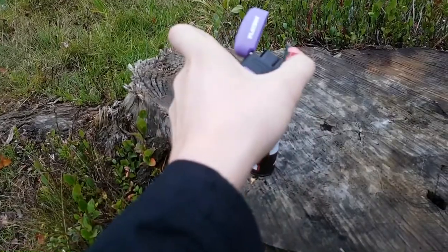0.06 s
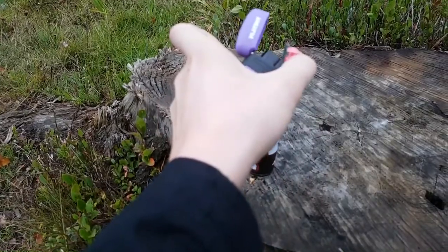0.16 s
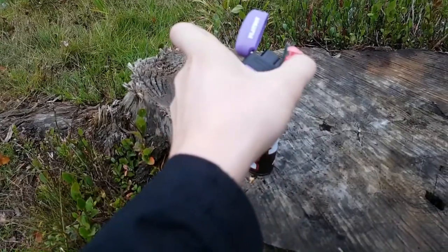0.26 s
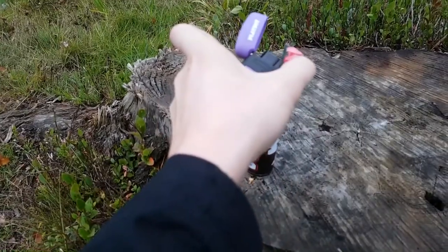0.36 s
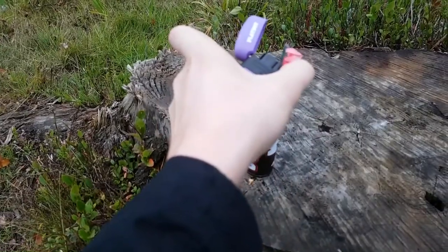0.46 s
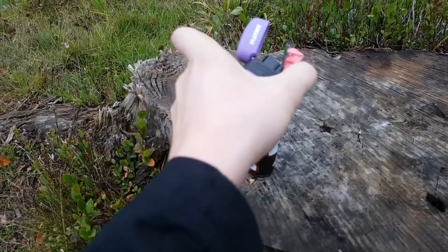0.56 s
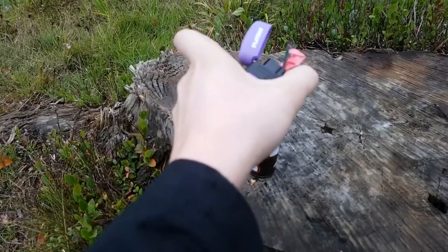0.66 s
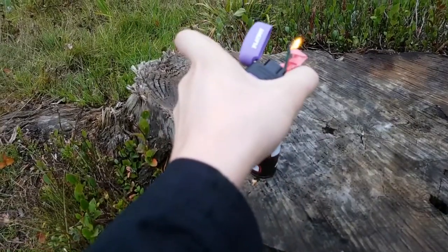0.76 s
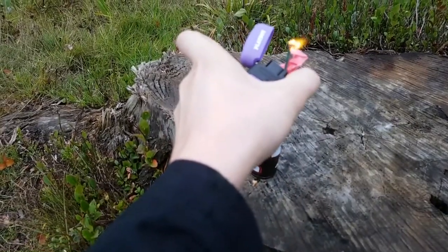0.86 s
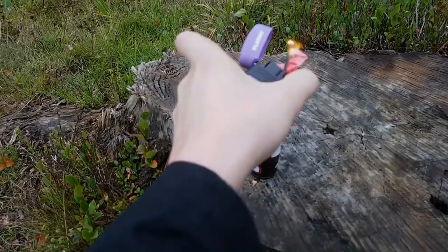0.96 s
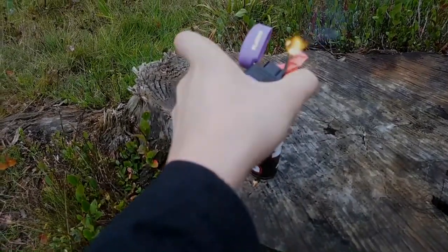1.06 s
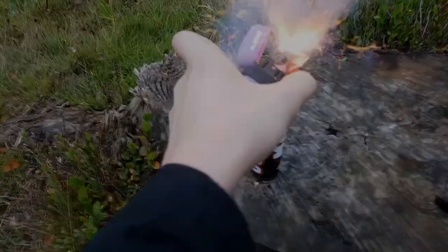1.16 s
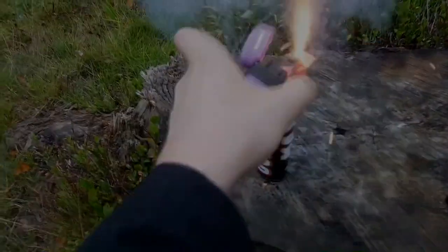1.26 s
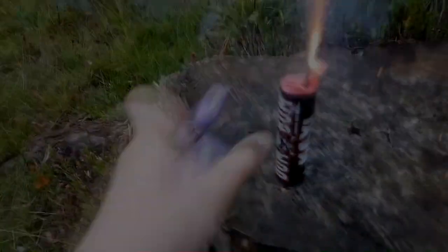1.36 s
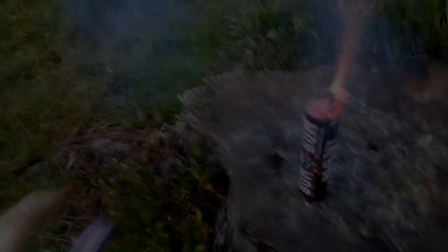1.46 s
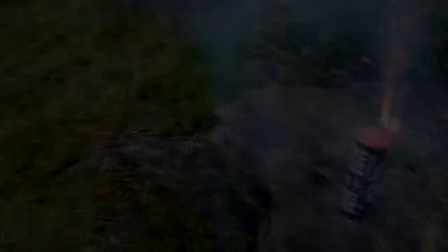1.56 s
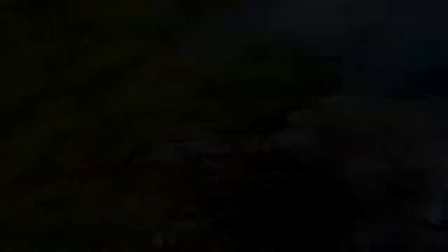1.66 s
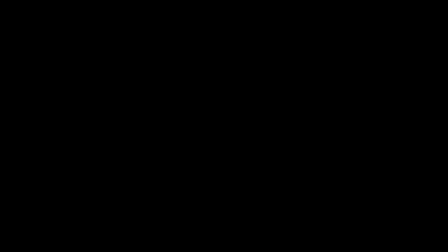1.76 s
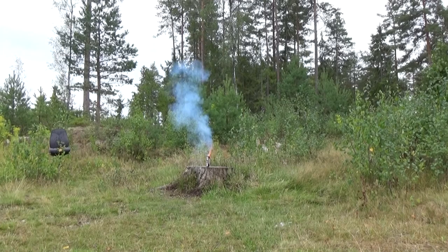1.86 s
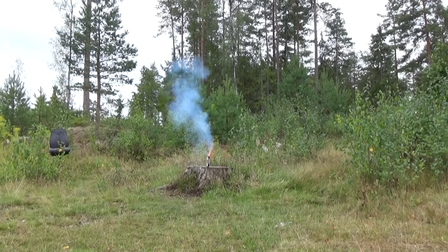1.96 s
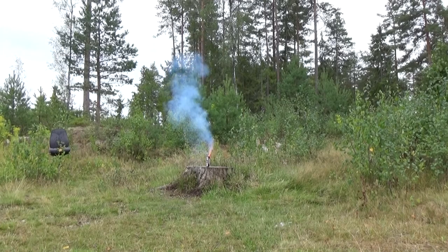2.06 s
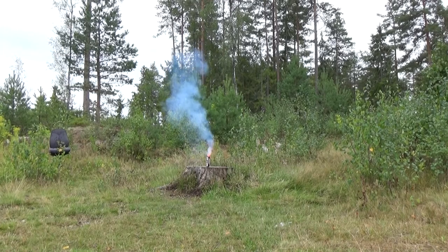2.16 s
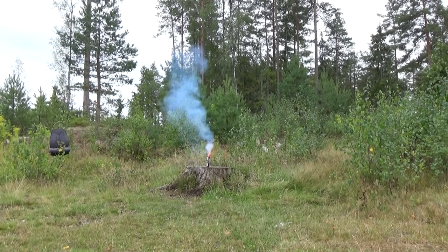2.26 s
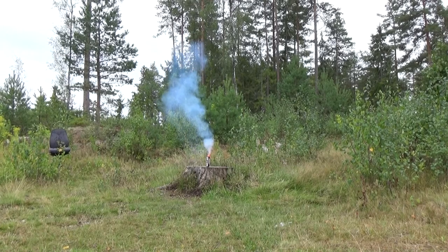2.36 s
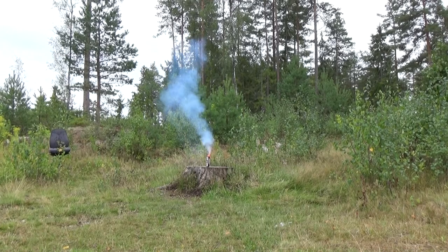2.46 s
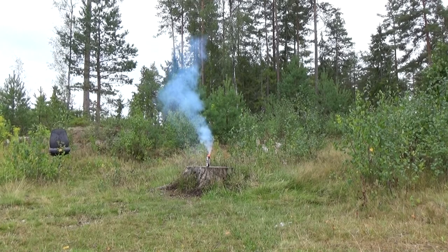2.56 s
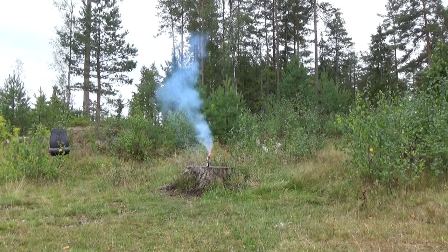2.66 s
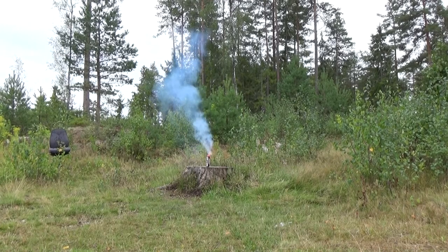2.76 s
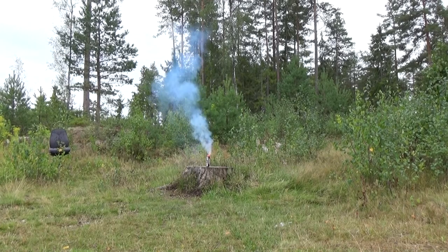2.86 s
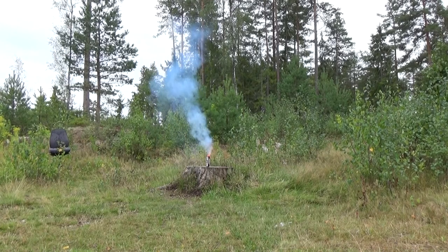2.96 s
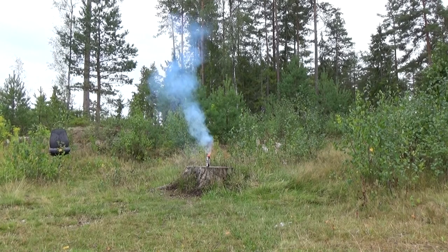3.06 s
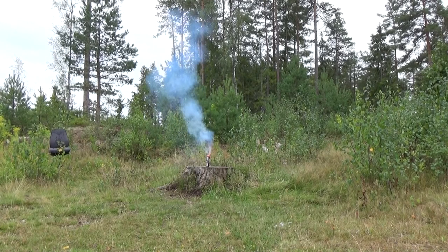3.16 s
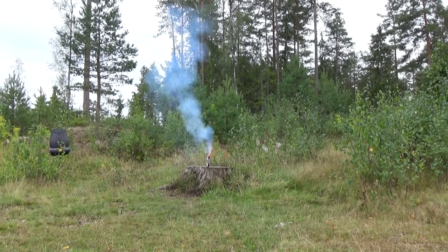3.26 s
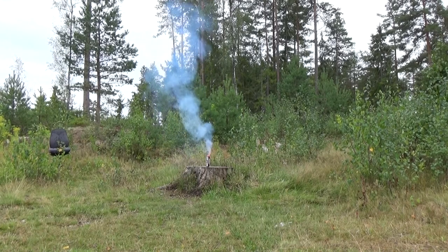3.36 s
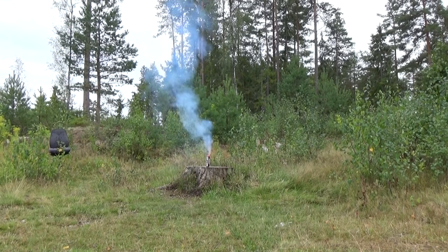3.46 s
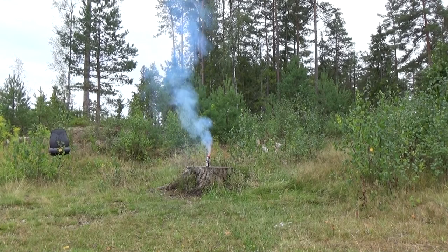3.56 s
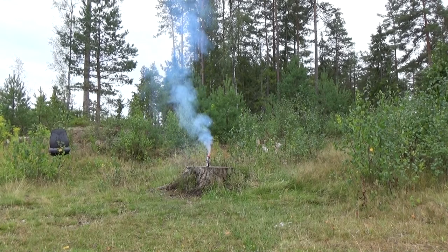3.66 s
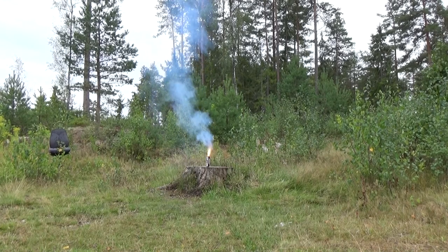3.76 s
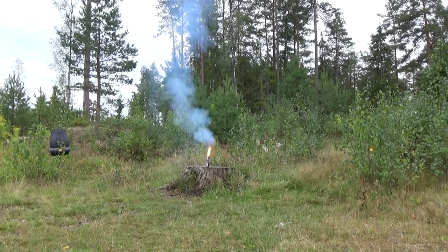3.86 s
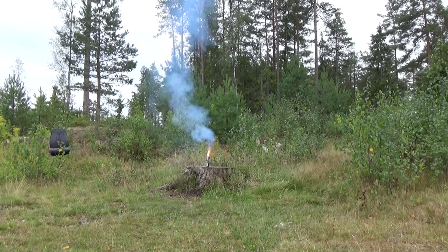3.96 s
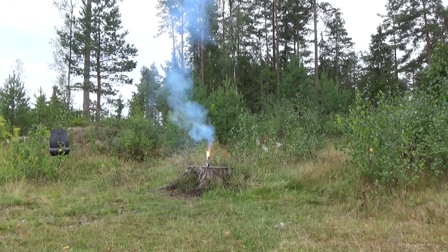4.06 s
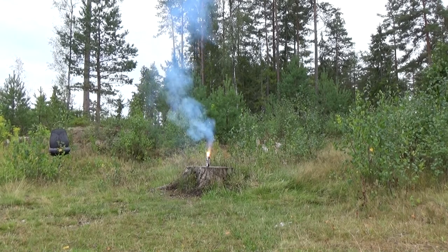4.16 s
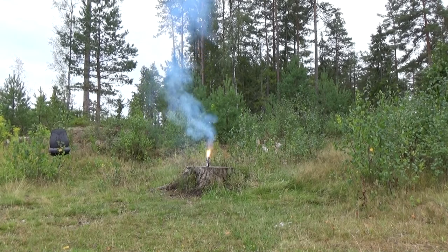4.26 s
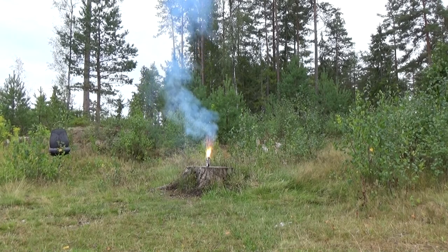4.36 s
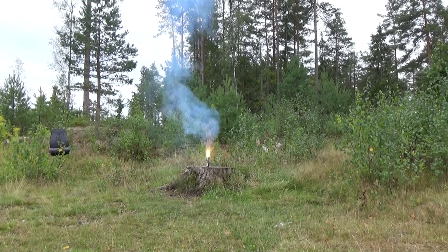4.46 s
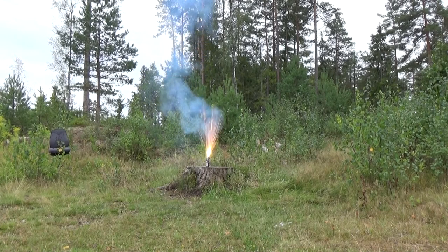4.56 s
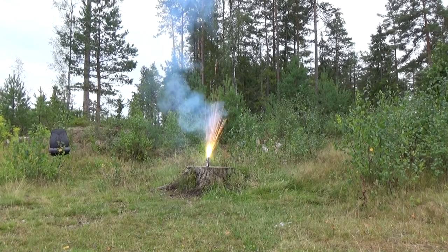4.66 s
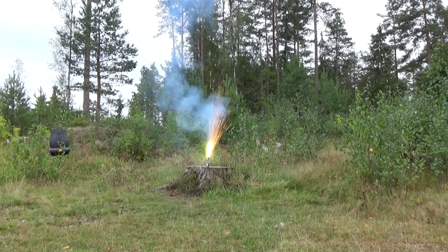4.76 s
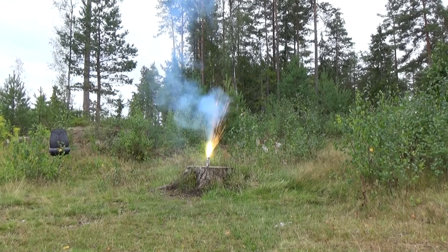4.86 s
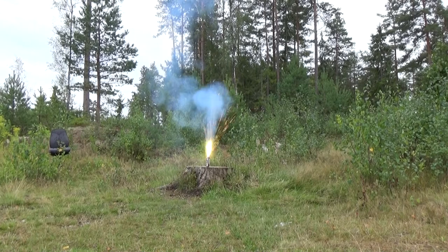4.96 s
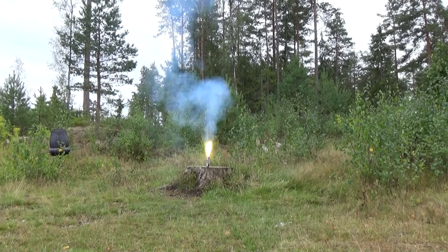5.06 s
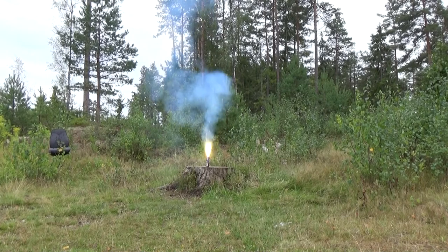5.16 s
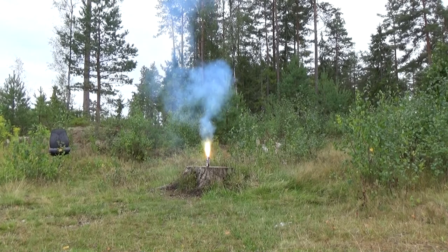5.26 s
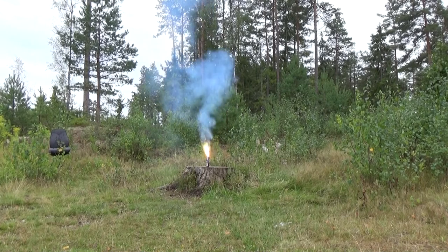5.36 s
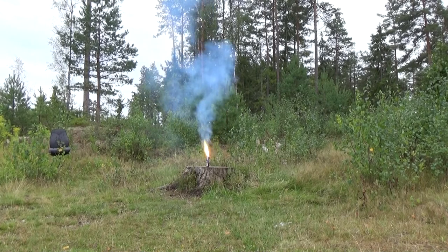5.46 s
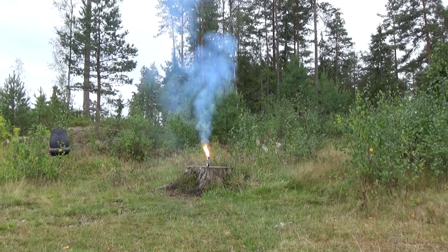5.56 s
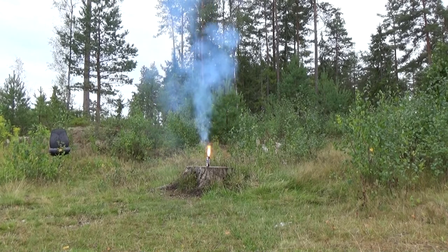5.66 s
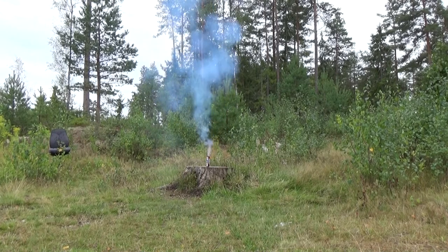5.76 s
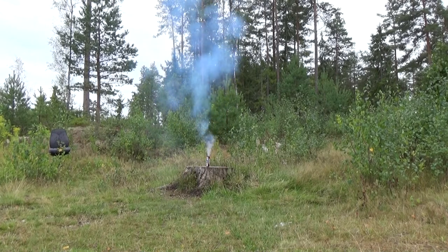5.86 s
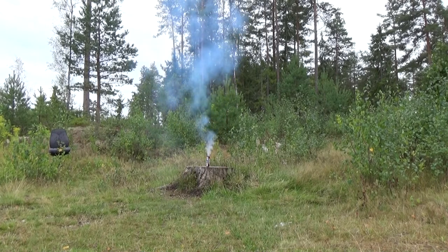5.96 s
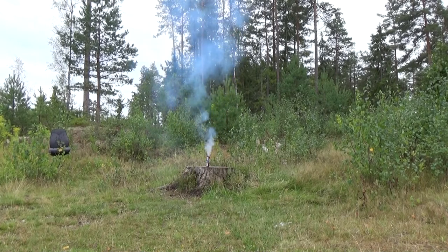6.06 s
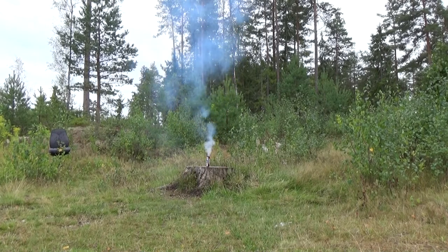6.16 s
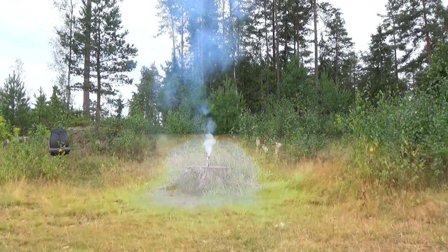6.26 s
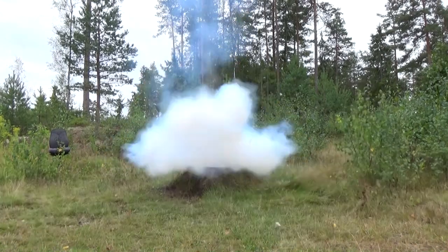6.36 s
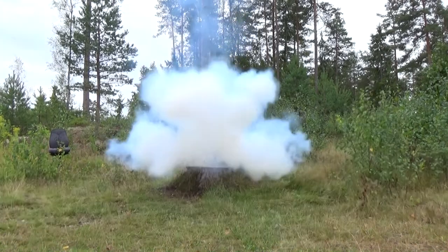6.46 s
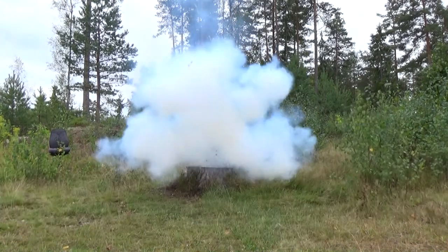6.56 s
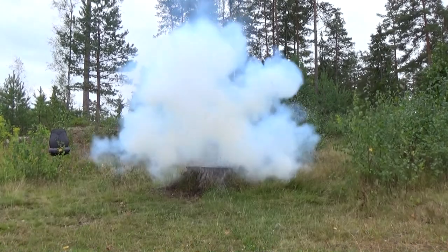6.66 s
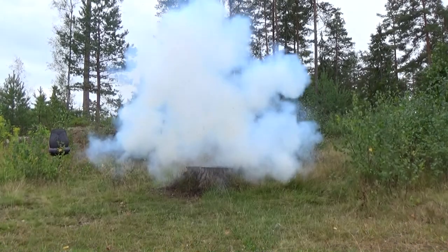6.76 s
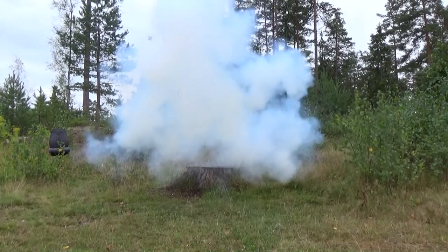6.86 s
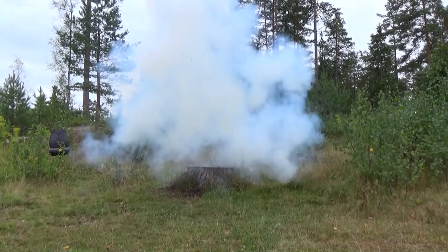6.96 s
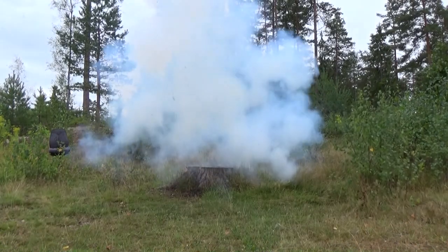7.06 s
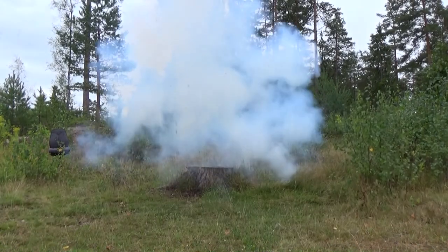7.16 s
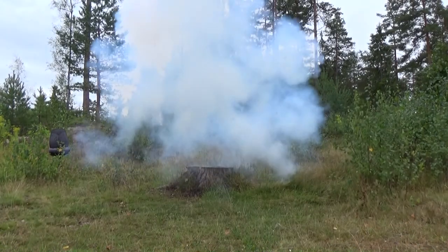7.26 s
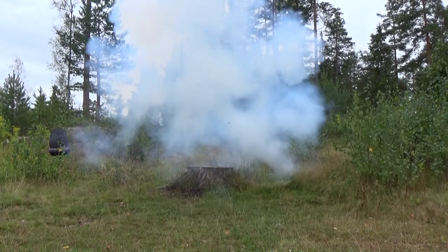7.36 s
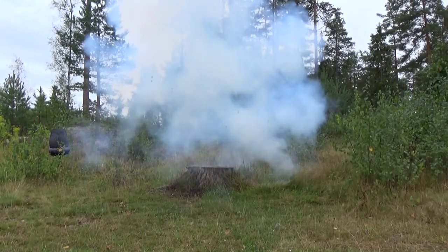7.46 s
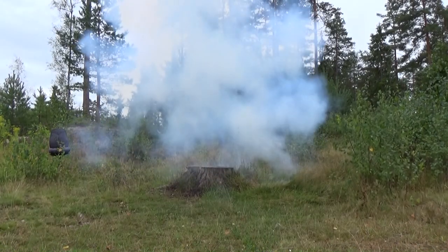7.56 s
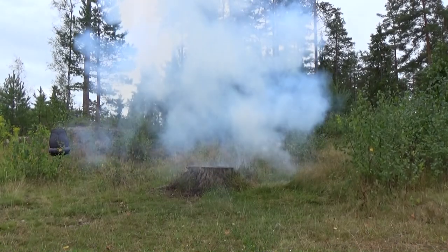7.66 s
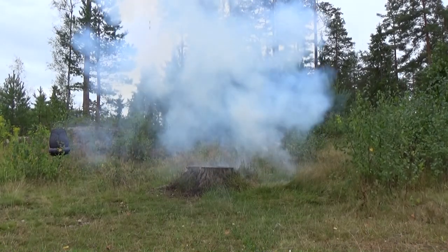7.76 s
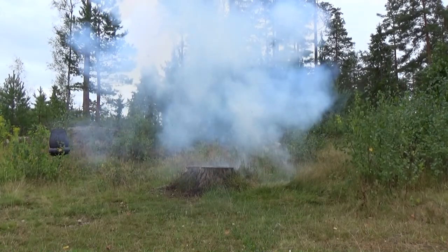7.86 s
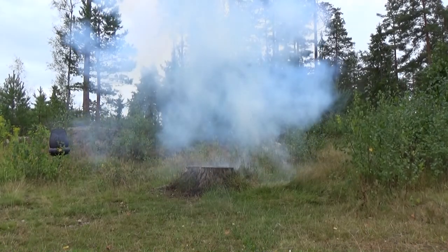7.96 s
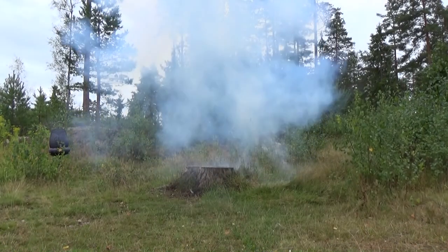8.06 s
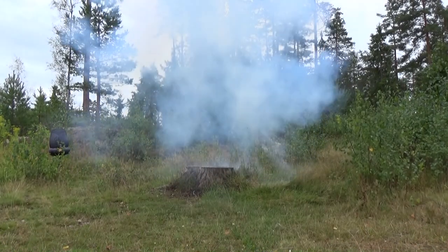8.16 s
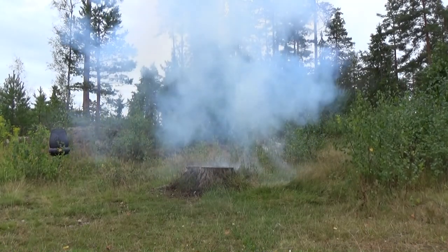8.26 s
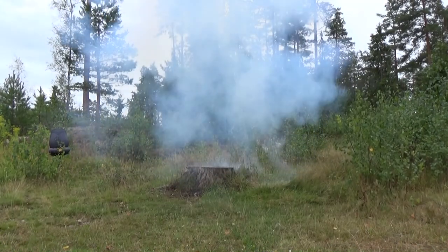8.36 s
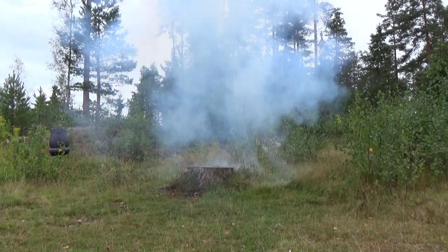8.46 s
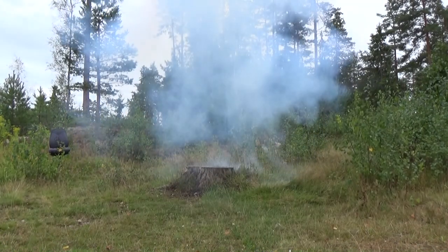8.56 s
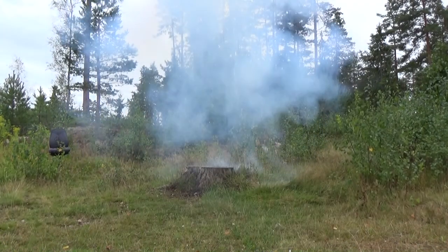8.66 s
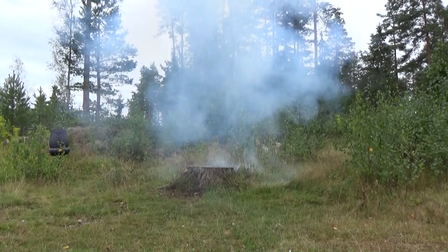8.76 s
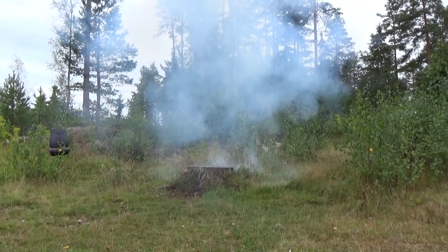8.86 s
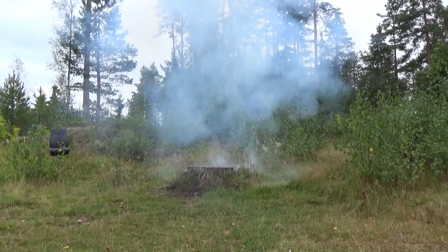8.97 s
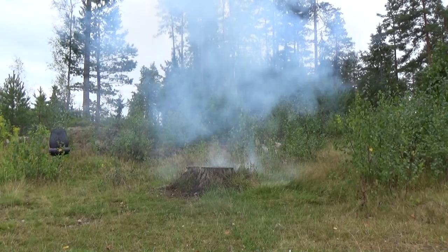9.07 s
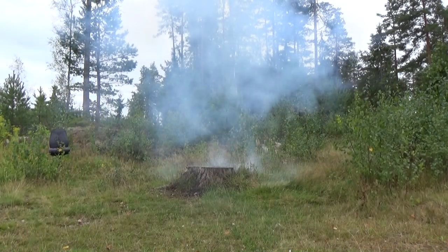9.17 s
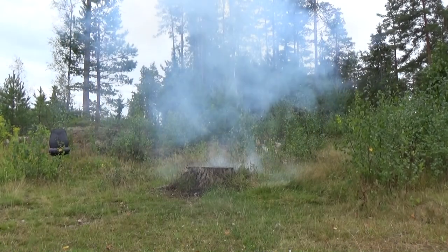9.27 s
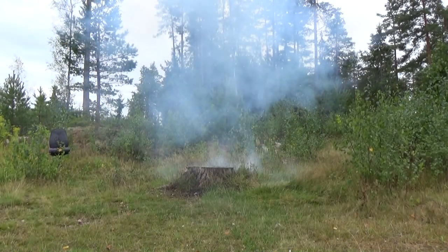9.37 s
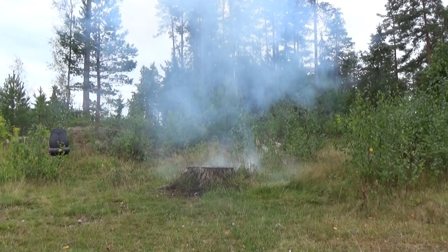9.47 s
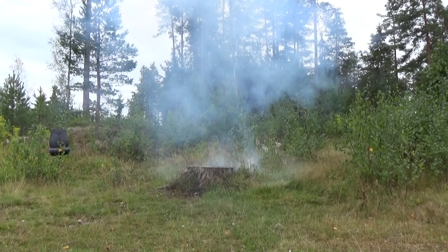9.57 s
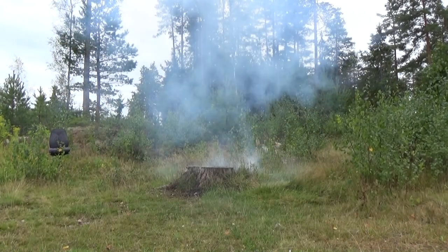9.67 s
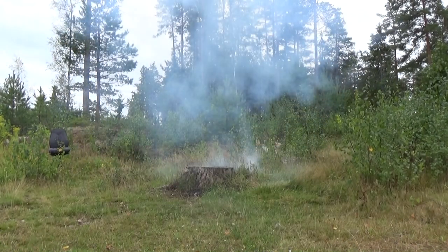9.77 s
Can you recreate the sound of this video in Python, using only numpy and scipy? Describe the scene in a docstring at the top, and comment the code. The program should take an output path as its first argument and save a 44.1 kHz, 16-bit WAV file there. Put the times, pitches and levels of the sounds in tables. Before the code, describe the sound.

At first the microphone is close: quiet low air, a lighter tick at 0.03 s, faint ticks and sputter from 0.4 to 1.0 s. At 1.05 s the fuse flares into dense bright fizz with a low flame body, fading after 1.6 s. A hard click at 1.74 s precedes a jump to several metres away at 1.84 s. The fuse hisses steadily with spits near 2.1 s over low wind, soft knocks at 3.3 s. From 4.1 s hiss and roar swell, strongest around 4.6 s, dip near 5, then surge again with a hollow falling tube tone, dulling at 5.65 s. Tiny spits lead to a huge crack at 6.3 s with a short sinking boom. Forest echo builds to about 6.6-6.8 s with thuds until 7.3, then darkens and decays. Fine grit patters from 7.5 s, again from 8.2 to 9.7 s, over faint wind.

```python
"""A lighter ticks close by, then a firecracker's fuse sputters and flares on a tree stump in a forest clearing.
From several metres off, the fuse hisses, swells to a roaring jet and sinks into its tube. The charge bangs,
the forest returns a long, darkening echo, and grit patters on the grass over low wind.
Flame, gas, wind and echo are flickering coloured noise with a moving level; ticks, spits, crack and
single echoes are decaying noise puffs; fine grit is random grains with short noise tails."""
import sys
import numpy as np
from scipy import signal
from scipy.fft import rfft, irfft
from scipy.io import wavfile
from scipy.ndimage import uniform_filter1d

SR = 44100
rng = np.random.default_rng(int(sys.argv[2]) if len(sys.argv) > 2 else 0)


def inscribe(sig):
    """Save sig as 16-bit PCM at rate SR to the path in sys.argv[1].

    A 1-D sig is mono; a 2-D sig holds one channel per row.
    Samples are clipped to [-1, 1] before scaling.
    """
    pcm = np.round(np.clip(np.atleast_2d(sig).T, -1, 1) * 32767)
    wavfile.write(sys.argv[1], SR, pcm.astype(np.int16))


N = 432621

# microphone close until FAR_S, then several metres off; charge goes off at BANG_S
FAR_S, BANG_S = 1.843, 6.3
# flame sinks into the tube: moment, transition time, treble lost, share of hiss pitch lost
SINK_S, SINK_TIME_S, SINK_DULL_DB, SINK_DROP_SHARE = 5.65, 0.1, 19.5, 0.24
# tube note sags as the cavity deepens
TUBE_FIRST_HZ, TUBE_LAST_HZ, TUBE_SETTLE_S = 2730, 1950, 0.68
# upper band limit of the recorder
EDGE_HZ = 16000

# stump reflection of the flare as the microphone draws away: [t/s, echo delay/ms]
STUMP_DELAY_MS = [(1.04, 2), (1.35, 1.73), (1.55, 1.5), (1.7, 0.35), (1.84, .4)]

# Spectra: shape only, absolute level set elsewhere
# background air close by: [f/Hz, relative level/dB]
CLOSE_AIR_DB = [(25, -18), (80, -1), (550, -0.5), (1100, 1.5), (1500, 1), (2100, -8.5), (4200, -19),
                (7300, -17), (10000, -30), (14800, -17)]
# sputtering priming: [f/Hz, relative level/dB]
PRIMING_DB = [(300, -12), (1200, -1), (2200, -8.5), (4000, -10), (6100, -1.5), (7600, -2), (8800, -12),
              (14000, -11)]
# low flame of the flare: [f/Hz, relative level/dB]
FLARE_BODY_DB = [(50, -29), (170, -12.5), (350, -2), (560, -7), (800, 0.5), (1100, -1), (1700, -2.5),
                 (2300, -10), (4000, -31)]
# spark fizz of the flare: [f/Hz, relative level/dB]
FLARE_FIZZ_DB = [(1000, -34), (2500, 1), (5000, 1.5), (7600, 1), (9000, -9), (11000, -6), (13000, -1.5),
                 (16000, -5)]
# fuse hiss and spits: [f/Hz, relative level/dB]
FUSE_DB = [(600, -30), (1500, -13), (2500, -4), (3600, -7), (4500, 0.5), (6700, 0), (7400, -2), (8200, -8),
           (9600, -9), (11500, -19.5), (16000, -25)]
# roaring jet: [f/Hz, relative level/dB]
JET_DB = [(40, -40), (120, -8), (220, 3), (450, 1.5), (620, -6.5), (880, -11), (1080, -3.5), (1300, -4.5),
          (1800, 0), (2500, -1), (3400, -5), (6000, -20)]
# wind over the clearing: [f/Hz, relative level/dB]
WIND_DB = [(25, -48), (60, -5.5), (130, 3), (180, 3.5), (270, -20.5), (600, -14.5), (1050, -5),
           (2000, -26.5), (6000, -22), (16000, -36.5)]
# bursting casing: [f/Hz, relative level/dB]
CRACK_DB = [(40, -11), (150, -2), (400, 0.5), (800, -11), (2500, -10.5), (4200, -12), (6400, 0),
            (8500, -5.5), (12000, -14), (16000, -18)]
# long boom, once settled in pitch: [f/Hz, relative level/dB]
BOOM_DB = [(25, -30), (55, -15), (85, 1.5), (125, 0.5), (190, -5.5), (400, -39), (4000, -90)]
# punch and low forest echo: [f/Hz, relative level/dB]
LOW_ECHO_DB = [(50, -43), (130, -29), (220, 12.5), (310, -8), (390, -3), (480, -0.5), (750, -8.5),
               (1100, -16.5), (1700, -35), (8000, -82)]
# bright forest echo before air loss: [f/Hz, relative level/dB]
BRIGHT_ECHO_DB = [(300, -27), (850, -7.5), (1180, 0.5), (1500, -2.5), (2300, -0.5), (3700, -4), (5000, 1),
                  (6100, 7), (8000, -1.5), (10000, -2), (16000, -17)]
# single forest echoes: [f/Hz, relative level/dB]
THUD_DB = [(40, -29), (120, 1), (300, 1), (1200, -7.5), (4000, -49), (16000, -75)]
# fine grit on grass: [f/Hz, relative level/dB]
GRIT_DB = [(1500, -24), (3900, -21), (5200, -3), (6500, 0.5), (8500, -4), (11000, -8.5), (16000, -21)]

# Two microphone ports
# next to the fuse: [f/Hz, left-right/dB, likeness 0-1, left lead/rad]
CLOSE_PORTS = [(900, -0.5, 1, 0.73), (2120, 2.5, 0.5, -1), (4500, -4.5, 0, -0.5), (12000, -1.5, 0.1, -1.5)]
# facing the stump from afar: [f/Hz, left-right/dB, likeness 0-1, left lead/rad]
FAR_PORTS = [(100, -9, 0.94, 0), (600, -6, 0.99, 0.18), (1050, -1.5, 0.92, 0), (1400, -7.5, 1, 0),
             (2150, -4, .99, 0), (4000, -6, .98, -0.2), (5300, 2, 1, 0.55), (6300, 5, 0.94, -0.085),
             (9100, -.5, 0.82, -.58), (12000, -1, 0.97, 0)]
# in the blast itself: [f/Hz, left-right/dB, likeness 0-1, left lead/rad]
BLAST_PORTS = [(100, -10, 0.98, -0.11), (300, -7, 0.6, -0.83), (900, 9, 0.6, 0.021), (2400, -2.5, 0.9, 0),
               (6500, 3, 0.9, -.1), (11000, -7, 0.7, -0.41)]
# for returns from all around: [f/Hz, left-right/dB, likeness 0-1, left lead/rad]
ECHO_PORTS = [(100, -11, 0.87, 0), (380, -3, 1, -0.18), (890, -11, 0.88, -0.16), (1220, -7, 0.95, 0.097),
              (2300, -2.5, 0.99, 0), (4200, -3.5, 0.99, 0), (6000, 7, 0.76, -0.024),
              (9000, -.5, 0.64, -0.72), (13000, -7, 0.5, -.1)]

# Short events; level/dB is a nominal peak
# lighter and first sparks: [t/s, level/dB, resonance f/Hz]
LIGHTER = [(.034, -29.5, 1400), (.372, -50, 3000), (.656, -42, 6500), (.727, -38, 6000), (.774, -51, 6000),
           (1.227, -19, 6000)]
# sharp handling click: [t/s, level/dB, decay/s]
CLICK = [(1.7385, -4.5, 0.0016)]
# fuse spits: [t/s, level/dB, decay/s]
FUSE_SPITS = [(1.845, -24, 0.086), (2.095, -17, .02), (2.108, -16.5, 0.015), (2.132, -10, .0036),
              (5.212, -19, .004), (5.388, -12, 0.00029), (5.664, -12, 0.0039), (6.284, -9.5, .0072),
              (6.294, -4, 0.0062)]
# gusts in the flame: [t/s, level/dB, resonance f/Hz]
GUSTS = [(3.78, -35, 398), (4.537, -15, 170), (4.775, -12, 333)]
# soft knocks nearby: [t/s, level/dB, resonance f/Hz]
KNOCKS = [(3.31, -22, 1190), (3.313, -22, 324), (3.362, -25, 1400)]
# bursting casing: [t/s, level/dB, decay/s]
CRACK = [(6.3027, 1.5, 0.021)]
# single echoes from the forest edge: [t/s, level/dB relative to the group gain, decay/s]
THUDS = [(6.638, -5.5, 0.046), (6.77, -5.5, 0.039), (6.842, -8, 0.013), (6.862, -16, .01),
         (7.105, -7, 0.0069), (7.215, -7.5, 0.007), (7.288, -12, .01)]
# largest bits landing: [t/s, level/dB relative to the group gain, resonance f/Hz]
LANDINGS = [(7.657, -27, 6380), (7.751, -18.5, 11600), (7.79, -19, 5800), (7.9678, -25.5, 11700),
            (8.332, -24, 8900), (8.3693, -24, 6850), (8.6347, -23, 5550), (8.954, -22.5, 5600),
            (9.207, -24, 5630), (9.2812, -27, 5030), (9.3524, -26, 5800), (9.438, -19, 7160),
            (9.712, -22, 6040)]

# Swells
# priming sputters: [start/s, rise/s, hold/s, level/dB, fall/(dB/s)]
SPUTTERS = [(.63, .2, .01, -56.5, 90), (.915, 0.048, 0.029, -46.5, 300)]
# low flame of the two flares: [start/s, rise/s, hold/s, level/dB, fall/(dB/s)]
FLARE_FLAME = [(1.052, 0.049, 0.2, -36.5, 21), (1.2, 0.035, .01, -38, 42)]
# fizz above the flame: [start/s, rise/s, hold/s, level/dB, fall/(dB/s)]
FLARE_SPRAY = [(1.055, 0.044, 0.51, -37, 57)]
# gas surges from the nozzle, pitch and treble as before the flame sinks:
# [start/s, rise/s, hold/s, level/dB, fall/(dB/s), pitch f/Hz, extra treble/dB]
SURGES = [(1.839, 0.0071, .01, -33, 19, 6700, 22), (2.09, 0.057, 0.082, -33.5, 3, 4420, 6),
          (2.848, 0.082, .05, -32, 0.2, 6030, 9), (4.06, 0.48, 0.041, -13, 18, 6360, 9.5),
          (5.067, 0.048, 0.57, -23, 16, 7400, -1.5)]
# roaring jet: [start/s, rise/s, hold/s, level/dB, fall/(dB/s)]
ROARS = [(1.838, 0.016, 0.42, -49, 1), (3.755, 0.012, 0.047, -40, 24), (4.12, 0.29, 0.56, -26.5, 40.5)]
# resonance of the emptied tube: [start/s, rise/s, hold/s, level/dB, fall/(dB/s)]
TUBE_NOTE = [(5.17, 0.19, 0.37, -29.5, 8)]
# short low punch of the blast: [start/s, rise/s, hold/s, level/dB, fall/(dB/s)]
PUNCH = [(6.292, 0.0064, 0.009, -22.5, 106)]
# long boom of the blast: [start/s, rise/s, hold/s, level/dB, fall/(dB/s)]
BOOM_SWELL = [(6.285, 0.068, 0.17, -23.5, 37)]
# grit thrown low, then thrown high: [start/s, rise/s, hold/s, level/dB, fall/(dB/s)]
SHOWERS = [(7.52, 0.21, .03, -52.5, 42), (8.2, 0.75, 0.5, -51, 26)]


def amp(db):
    """Decibels to gain."""
    return 10 ** (np.asarray(db) / 20)


def evened(x):
    """Scales to an rms of one."""
    return x / np.sqrt(np.mean(x ** 2) + 1e-20)


def read(points, hz, axis=1):
    """One table column, interpolated on a log-frequency axis."""
    columns = np.transpose(points)
    return np.interp(np.log(hz + 1), np.log(columns[0] + 1), columns[axis])


def follow(curve, t, axis=1):
    """One column of a curve at the times t."""
    columns = np.transpose(curve)
    return np.interp(t, columns[0], columns[axis])


def coloured(points):
    """A table as a steady colour(t, hz)."""
    return lambda t, hz: read(points, hz)


def bump_db(hz, centre_hz, width_hz):
    """Gain of one resonance in dB."""
    return -10 * np.log10(1 + ((hz ** 2 - centre_hz ** 2) / ((hz + 1) * width_hz)) ** 2)


def swell(row, t):
    """Gain that rises in a straight line, holds, then dies away."""
    start_s, rise_s, hold_s, db, fall_db_per_s = row[:5]
    falling_s = np.maximum(t - start_s - rise_s - hold_s, 0)
    return np.clip((t - start_s) / rise_s, 0, 1) * amp(db - fall_db_per_s * falling_s)


def swells(rows):
    """Joint gain(t) of overlapping swells, summed in power."""
    return lambda t: np.sqrt(sum(swell(row, t) ** 2 for row in rows))


def drift(db, db_per_s):
    """Gain(t) of a background that changes steadily, db at t = 0."""
    return lambda t: amp(db + db_per_s * t)


def add(mix, s, sound):
    """Mixes a stereo sound in at s seconds."""
    part = mix[:, max(round(s * SR), 0):][:, :sound.shape[1]]
    part += sound[:, :part.shape[1]]


def at_ports(z, hz, ports):
    """Turns two unrelated spectra into what the left and right ports pick up."""
    like = np.clip(read(ports, hz, axis=2), 0, 1)
    lean = amp(read(ports, hz) / 2)
    lead = np.exp(1j * read(ports, hz, axis=3))
    left = z[0] * lean * lead
    right = (like * z[0] + np.sqrt(1 - like ** 2) * z[1]) / lean
    # the average of both ports keeps the source power
    return np.array([left, right]) * 2 / np.sqrt(lean ** 2 + lean ** -2 + 2 * like * lead.real)


def rush(span_s, level, band_hz, colour, ports, flicker_db, patchy_db, size=512):
    """Turbulent noise of a moving colour(t, hz), whose rms within the band is level(t)."""
    begin, end = span_s
    start, hop = max(int(begin), 0), size // 4
    frames = (int(end) + 1 - start) * SR // hop
    t = start + np.arange(frames)[:, None] * hop / SR
    hz = np.fft.rfftfreq(size, 1 / SR)
    a, b, c, d, patches = rng.standard_normal((5, frames, size // 2 + 1))
    shape = amp(colour(t, hz) + 0 * t)
    # unit in-band power at every moment: level(t) alone sets the loudness
    in_band = (hz >= band_hz[0]) & (hz <= band_hz[1])
    shape /= np.sqrt((shape[:, in_band] ** 2).sum(1, keepdims=True))
    # eddies: patches in time and frequency, plus a flicker shared by all bands
    patches = uniform_filter1d(patches, size=7, axis=0)
    patches = evened(uniform_filter1d(patches, size=14, axis=1))
    flicker = evened(signal.lfilter([1], [1, -.8], rng.standard_normal(frames)))
    unrest = evened(amp(patchy_db * patches + flicker_db * flicker[:, None]))
    z = at_ports(np.array([a + 1j * b, c + 1j * d]) * shape * unrest, hz, ports)
    sound = signal.istft(z, nperseg=size, noverlap=size - hop, time_axis=1, freq_axis=2)[1]
    sound = sound * np.sqrt(3 / 2)  # makes up for overlap of unrelated frames
    t = start + np.arange(sound.shape[1]) / SR
    fade = np.clip(np.minimum(t - begin, end - t) / .008 + 1, 0, 1)  # 8 ms beyond each end
    out = np.zeros((2, N))
    add(out, start, sound * fade * level(t))
    return out


def tinted(pair, colour, ports):
    """Gives two noises one colour(hz) and places them at the ports."""
    hz = np.fft.rfftfreq(pair.shape[1], 1 / SR)
    spectra = rfft(pair) * evened(amp(colour(hz)))
    return irfft(at_ports(spectra, hz, ports), pair.shape[1])


def puff(s, db, decay_s, colour, ports, size=8192):
    """Sudden noise burst with exponential decay; its nominal peak is three times its first rms."""
    t = (np.arange(size) - size // 32) / SR
    noise = rng.standard_normal((2, size)) * (t >= 0) * np.exp(-abs(t / decay_s))
    return s + t[0], amp(db) / 3 * tinted(noise, colour, ports)


def bursts(rows, colour, ports):
    """Puffs of one colour, each with its own decay."""
    out = np.zeros((2, N))
    for s, db, decay_s in rows:
        add(out, *puff(s, db, decay_s, colour, ports))
    return out


def ticks(rows, ports, decay_s, width_share):
    """Small impacts, each with one broad resonance whose width is a share of its frequency."""
    out = np.zeros((2, N))
    for s, db, centre_hz in rows:
        def ring_db(hz):
            return 2 * bump_db(hz, centre_hz, width_share * centre_hz)
        add(out, *puff(s, db, decay_s, ring_db, ports))
    return out


def lighting():
    """Lighter ticks, sputtering priming, then the flare combed by its sweeping reflection off the stump."""
    def mirror_db(t, hz, depth=0.26, reach_hz=5000):
        delay_s = follow(STUMP_DELAY_MS, t) / 1000
        return 20 * np.log10(abs(1 + depth * np.exp(-hz / reach_hz + 2j * np.pi * hz * delay_s)))

    def sparkle_db(t, hz, first_db=-5, lift_db=7, peak_s=1.48, width_s=.2, above_hz=8500, edge_hz=1500):
        # spark spray is brightest just before the flare dies
        top = .5 + .5 * np.tanh((hz - above_hz) / edge_hz)
        return top * (first_db + lift_db * np.exp(-((t - peak_s) / width_s) ** 2))

    def body_db(t, hz):
        return read(FLARE_BODY_DB, hz) + mirror_db(t, hz)

    def fizz_db(t, hz):
        return read(FLARE_FIZZ_DB, hz) + mirror_db(t, hz) + sparkle_db(t, hz)

    close_s, flaring_s = (0, FAR_S), (1, FAR_S)
    air = rush(close_s, drift(db=-58, db_per_s=1.0), (30, 16000), coloured(CLOSE_AIR_DB), CLOSE_PORTS,
               flicker_db=-0.9, patchy_db=-2.4, size=1024)
    priming = rush(close_s, swells(SPUTTERS), (4000, 16000), coloured(PRIMING_DB), CLOSE_PORTS,
                   flicker_db=3.5, patchy_db=3)
    body = rush(flaring_s, swells(FLARE_FLAME), (200, 2500), body_db, CLOSE_PORTS,
                flicker_db=1.6, patchy_db=1.0, size=1024)
    fizz = rush(flaring_s, swells(FLARE_SPRAY), (2500, 16000), fizz_db, CLOSE_PORTS,
                flicker_db=1.1, patchy_db=1.1)
    click = bursts(CLICK, lambda hz: bump_db(hz, 830, 6300), CLOSE_PORTS)
    lighter = ticks(LIGHTER, CLOSE_PORTS, decay_s=0.0026, width_share=0.83)
    return air + priming + body + fizz + click + lighter


def fuse():
    """Gas hisses from the nozzle and spits; the flame roars in gusts; the emptied tube adds a hollow note."""
    def hiss_db(t, hz, focus=0.55, treble_hz=7000):
        # the strongest surge dominates pitch and treble; the tube lowers both
        power = np.array([swell(row, t) ** 2 for row in SURGES]) + 1e-20
        pitch_hz, treble_db = np.tensordot(np.transpose(SURGES)[-2:], power / power.sum(0), 1)
        sunk = .5 + .5 * np.tanh((t - SINK_S) / SINK_TIME_S)
        top_db = np.clip(np.log2((hz + 1) / treble_hz), 0, 1) * (treble_db - SINK_DULL_DB * sunk)
        sunk_pitch_hz = pitch_hz * (1 - SINK_DROP_SHARE * sunk)
        return read(FUSE_DB, hz) + top_db + focus * bump_db(hz, sunk_pitch_hz, 1920)

    def tube_db(t, hz, focus=2.45, width_hz=1400):
        shallow = np.exp(-np.maximum(t - TUBE_NOTE[0][0], 0) / TUBE_SETTLE_S)
        note_hz = TUBE_LAST_HZ + (TUBE_FIRST_HZ - TUBE_LAST_HZ) * shallow
        return focus * bump_db(hz, note_hz, width_hz)

    def roar_db(t, hz, dull_db_per_octave=2.14, pivot_hz=500):
        # a weak flame is duller than the full jet
        strength = swells(ROARS)(t)
        weakness = 1 - strength / strength.max()
        return read(JET_DB, hz) - dull_db_per_octave * weakness * np.log2(1 + hz / pivot_hz)

    burning_s = (FAR_S, BANG_S)
    hiss = rush(burning_s, swells(SURGES), (4000, 8000), hiss_db, FAR_PORTS,
                flicker_db=0.89, patchy_db=0.77)
    roar = rush(burning_s, swells(ROARS), (250, 1400), roar_db, FAR_PORTS,
                flicker_db=0.4, patchy_db=1.5, size=1024)
    tube = rush((TUBE_NOTE[0][0], BANG_S), swells(TUBE_NOTE), (1500, 3200), tube_db, FAR_PORTS,
                flicker_db=0.5, patchy_db=1.3)
    gusts = ticks(GUSTS, FAR_PORTS, decay_s=0.013, width_share=1.0)
    spits = bursts(FUSE_SPITS, lambda hz: read(FUSE_DB, hz), FAR_PORTS)
    return hiss + roar + tube + gusts + spits


def clearing():
    """Low turbulent wind over the clearing and a few soft, resonant knocks."""
    wind = rush((FAR_S, N / SR), drift(db=-46, db_per_s=-0.37), (25, 300), coloured(WIND_DB), FAR_PORTS,
                flicker_db=3.2, patchy_db=1.5, size=2048)
    return wind + ticks(KNOCKS, FAR_PORTS, decay_s=0.0078, width_share=0.71)


def bang():
    """Crack, boom sinking as the cloud grows, and scatter from ever farther trees, dulled by the air."""
    def age_s(t):
        return np.maximum(t - BANG_S, 0)

    def forest(t, db, return_s, build_db_per_s, spread_db_per_decade, loss_db_per_s):
        # builds until the forest edge answers, then thins with path length
        early_s = np.maximum(return_s - age_s(t), 0)
        late_s = np.maximum(age_s(t) - return_s, 0)
        spread_db = spread_db_per_decade * np.log10(1 + late_s / return_s)
        return amp(db - build_db_per_s * early_s - spread_db - loss_db_per_s * late_s)

    def low_level(t):
        # the negative loss slows the decay
        echo = forest(t, db=-24.5, return_s=0.54, build_db_per_s=32,
                      spread_db_per_decade=23, loss_db_per_s=-0.97)
        return np.hypot(swells(PUNCH)(t), echo)

    def bright_level(t):
        return forest(t, db=-21.5, return_s=0.29, build_db_per_s=24,
                      spread_db_per_decade=12.5, loss_db_per_s=4.0)

    def boom_db(t, hz, first_rise=0.8, sink_s=0.06, ring_hz=118, ring_width_hz=70, focus=0.56):
        settled_hz = hz / (1 + first_rise * np.exp(-age_s(t) / sink_s))
        return read(BOOM_DB, settled_hz) + focus * bump_db(settled_hz, ring_hz, ring_width_hz)

    def scatter_db(t, hz, loss_db_per_s=10.5, at_hz=2500, steepness=1.15):
        return read(BRIGHT_ECHO_DB, hz) - loss_db_per_s * (hz / at_hz) ** steepness * age_s(t)

    after_s = (BANG_S, N / SR)
    crack = bursts(CRACK, lambda hz: read(CRACK_DB, hz), BLAST_PORTS)
    boom = rush(after_s, swells(BOOM_SWELL), (40, 200), boom_db, BLAST_PORTS,
                flicker_db=-0.5, patchy_db=0.9, size=1024)
    low = rush(after_s, low_level, (200, 700), coloured(LOW_ECHO_DB), ECHO_PORTS,
               flicker_db=2.4, patchy_db=0.5)
    bright = rush(after_s, bright_level, (1000, 3500), scatter_db, ECHO_PORTS,
                  flicker_db=-0.44, patchy_db=1.74)
    thuds = bursts(THUDS, lambda hz: read(THUD_DB, hz), ECHO_PORTS)
    return crack + boom + low + bright + amp(-3.0) * thuds


def fallout(grains_per_s=420, spread_db=4.5):
    """Fine grit rains on the grass as random grains in two showers, with a few larger bits among it."""
    t = np.arange(N) / SR
    hits = rng.random(N) < grains_per_s / SR
    grains = hits * amp(spread_db * np.minimum(rng.exponential(1, N), 3.5))
    tails = signal.lfilter([1], [1, -np.exp(-1 / (.0008 * SR))], grains)  # 0.8 ms decay
    rustle = evened(tails * rng.standard_normal((2, N)))
    grit = tinted(rustle * swells(SHOWERS)(t), lambda hz: read(GRIT_DB, hz), ECHO_PORTS)
    return grit + amp(3.5) * ticks(LANDINGS, ECHO_PORTS, decay_s=0.0011, width_share=0.49)


def scene():
    """All sources together."""
    return lighting() + fuse() + clearing() + bang() + fallout()


def record(dry):
    """Rounds off the loudest peaks, then limits the band."""
    rounded = dry / (1 + dry ** 6) ** (1 / 6)
    lowpass = signal.firwin(511, EDGE_HZ, window=("kaiser", 9), fs=SR)
    return signal.oaconvolve(rounded, lowpass[None], "same")


dry = scene()
out = record(dry)
inscribe(out)
```